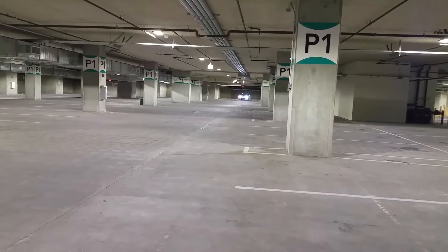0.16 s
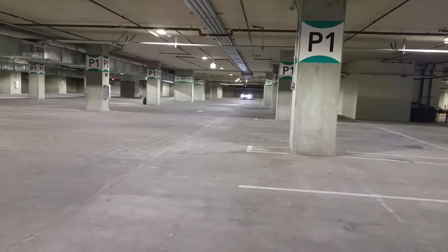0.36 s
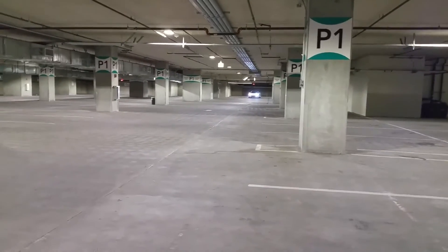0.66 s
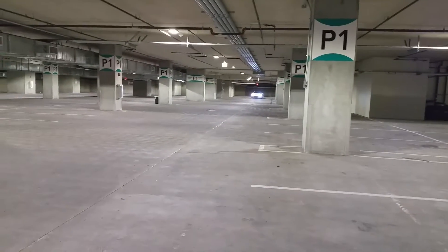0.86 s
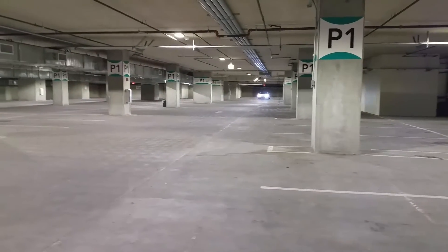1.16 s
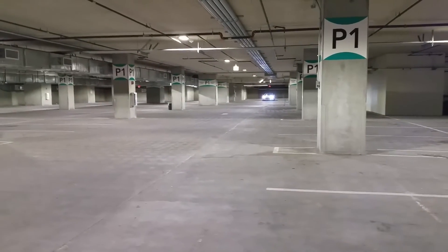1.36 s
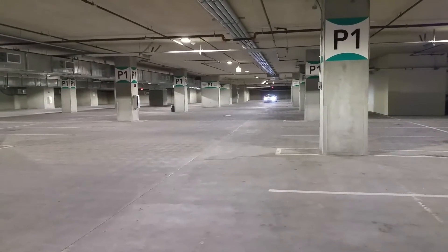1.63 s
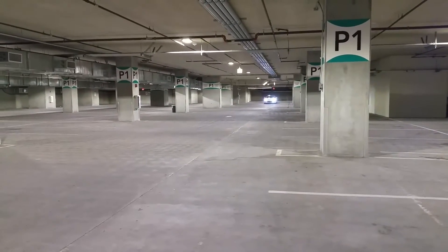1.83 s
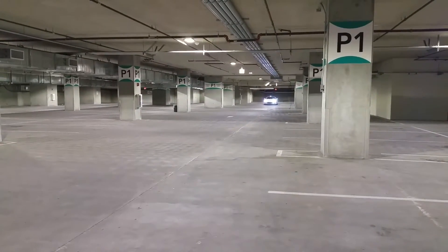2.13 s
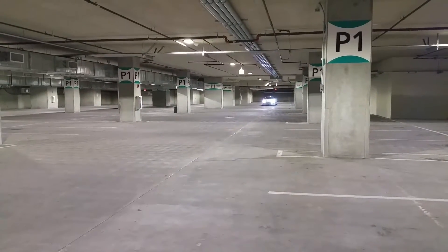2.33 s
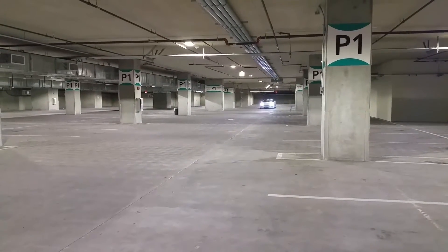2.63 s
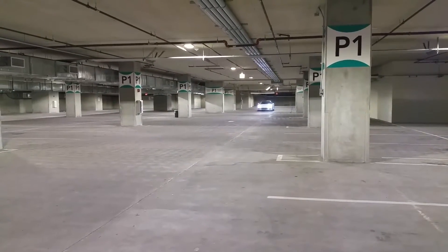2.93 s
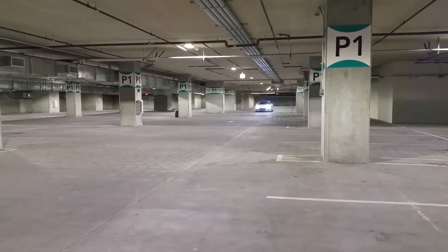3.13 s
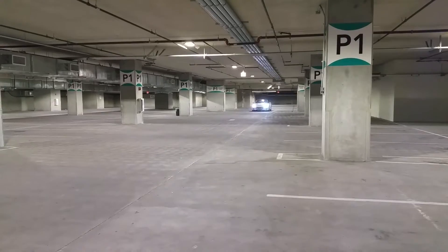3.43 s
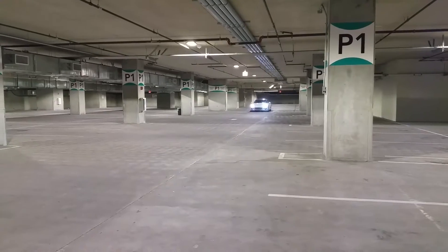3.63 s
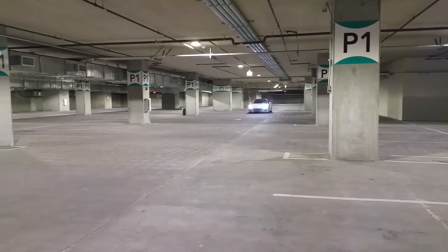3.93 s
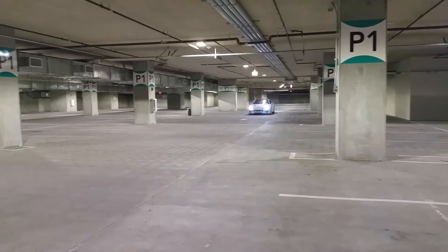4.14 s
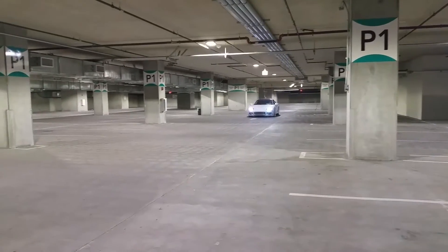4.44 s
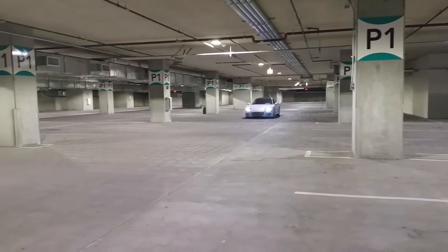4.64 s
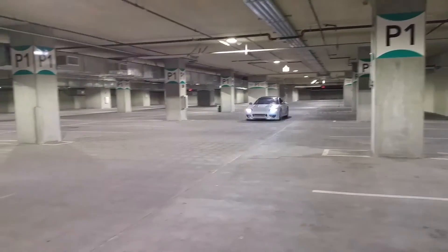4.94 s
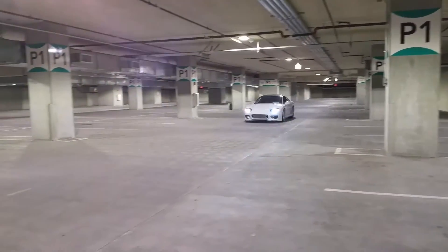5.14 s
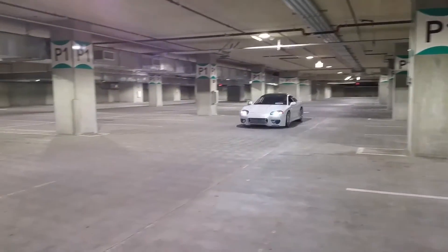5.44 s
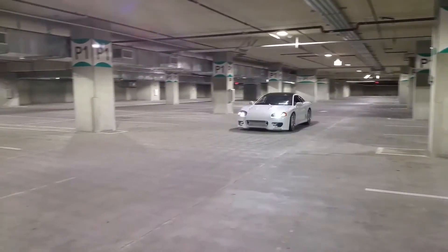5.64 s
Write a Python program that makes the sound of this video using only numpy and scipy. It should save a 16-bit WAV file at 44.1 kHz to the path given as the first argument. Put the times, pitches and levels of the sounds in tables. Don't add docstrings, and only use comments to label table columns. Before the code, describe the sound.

In an empty concrete parking garage, a distant turbocharged six-cylinder car pulls toward a small stereo recorder, its low drone climbing and roar swelling. The throttle lifts with a bright valve whistle; it pulls again, a tiny knock hits the recorder, then a longer whistle sounds and the revs fall, all smeared by long echo.

```python
import sys
import numpy as np
from scipy import signal
from scipy.fft import rfft, irfft
from scipy.io import wavfile
from scipy.ndimage import uniform_filter1d

SR = 44100
rng = np.random.default_rng(int(sys.argv[2]) if len(sys.argv) > 2 else 0)


def transcribe(signal):
    frames = np.atleast_2d(signal).T
    limited = np.clip(frames, -1, 1)
    pcm = np.round(limited * 32767).astype(np.int16)
    wavfile.write(sys.argv[1], SR, pcm)


def gain_from_db(level_db):
    decades = np.asarray(level_db, float) / 20
    return 10 ** decades


N = 254853
LEAD = SR
T = np.arange(-LEAD, N) / SR

# frequency in Hz, 60 dB decay time in s.
HALL_DECAY = [(60, 3.8), (250, 2.3), (1000, 5), (4000, 3.7), (7000, 1.32), (13000, 0.41)]
# frequency in Hz, left-right likeness from 0 to 1.
LIKENESS = [(60, 1), (130, 0.97), (300, 0.9), (680, 0.58), (1530, 0.017), (3450, 0.12), (7750, 0.03)]
# frequency in Hz, left minus right in dB.
LEAN = [(60, 2), (350, 1.5), (850, 0), (2000, -0.5), (3200, -6), (5000, -15), (6500, -8.5), (8500, -1),
        (12000, 2), (15000, 5)]

# time in s, pipe roar in dB, intake and tyre hiss in dB.
ROAR = [(0, -38, -50), (.6, -33.5, -43.5), (1.25, -28, -42), (1.8, -24.5, -36.5), (2.2, -21, -33),
        (2.53, -21, -29), (2.6, -23.5, -29), (2.75, -28.5, -28), (3.2, -21.5, -27), (3.32, -21, -29.5),
        (3.46, -25, -32), (3.9, -20.5, -30), (4.14, -20, -28), (4.25, -28.5, -31.5), (4.45, -29.5, -31),
        (4.76, -26, -28), (5.25, -25, -32.5), (5.78, -20.5, -31)]
# lower edge in Hz, upper edge in Hz.
ROAR_BANDS = [
    (60, 200),
    (250, 500),
    (500, 1500),
    (1500, 5500),
    (8000, 12000),
]
# frequency in Hz, density in dB per Hz.
ROAR_COLOUR = [(20, -62), (35, -29), (55, -12), (200, -9), (400, -18), (650, -19.5), (1000, -16.5),
               (1500, -20.5), (2200, -20), (3800, -27.5), (6000, -38), (8000, -50.5), (11000, -64),
               (15500, -73)]
BOOM_DB, BOOM_DB_PER_S = -.5, -1.
BODY_SHARE, BODY_DB, BODY_DB_PER_S = .45, -1.5, 1
AIR_DB, AIR_DB_PER_S = -25, 0.73
PUFF_DB, PUFF_DB_PER_S, PUFF_RISE_S = -20, 2.5, .04

SPOOL_S, SPOOL_HZ, SPOOL_HZ_PER_S, TOP_HZ = 3.3, 10500, 9500, 15300
RUN_DOWN_S, RUN_DOWN_TAU_S, TURBO_DB, TURBO_DB_PER_KHZ = 4.8, 1.6, -70, 2.8

# start in s, length in s, frequency in Hz, level in dB.
MURMURS = [
    (2.427, 0.36, 2240, -33),
    (2.503, 0.12, 4400, -33),
    (4.127, 0.15, 2180, -25),
    (4.152, 0.17, 1215, -26),
    (4.158, 0.087, 4460, -38),
]
# multiple of the pitch, width in Hz, level in dB.
VALVE_TONES = [
    (1, 130, 0),
    (1.598, 1500, -57.5),
    (2, 353, -30),
]
# start in s, jet level in dB, opening snap in Hz, closing rate in dB per s,
# closing rise in Hz.
LIFTS = [
    (2.568, -14, 482, 130, 123),
    (4.156, -14, 180, 24, 480.5),
]
OPEN_S, BURST_DB, BURST_S, LEAK_DB_PER_S = 0.014, 1.5, 0.028, 23
SETTLE_HZ, SAG_HZ, SAG_S, HOLD_S, SNAP_S, CLOSE_S = 6178, 661, .25, 0.6, 0.0161, .25

# time in s, firing rate of one bank in Hz.
FIRING = [(0, 52), (.2, 58), (.8, 68), (1.0, 74), (1.45, 96), (1.62, 113), (2.2, 130), (2.42, 138),
          (2.56, 134), (2.85, 64), (3.1, 60.5), (3.45, 64), (3.95, 69), (4.25, 75.5), (4.45, 77),
          (4.95, 75), (5.3, 65), (5.78, 54)]
# time in s, load in dB, multiple that the exhaust pulse favours.
LOAD = [(0, -20.5, 1.), (.45, -19, 1.1), (.95, -13, .9), (1.3, -15.5, 1.1), (1.65, -12.5, .9),
        (2.25, -16, .9), (2.5, -36.5, 2.5), (2.85, -20, 3.2), (3.1, -25, 2.4), (3.45, -15, 2.4),
        (3.9, -17, 2.6), (4.12, -14.5, 2.3), (4.27, -27, 2.2), (4.5, -20.5, 2.1), (4.9, -23, 1.9),
        (5.1, -20.5, 1.2), (5.5, -26, 1.1), (5.78, -24.5, 1.1)]
# frequency in Hz, width in Hz, level in dB under the load.
PIPE_MODES = [
    (68, 16, -19),
    (124, 20, -13),
    (192, 22, -13),
]
# frequency in Hz, gain in dB.
PIPE_GAIN = [(50, 1.5), (70, 3), (92, -3.5), (128, 2.5), (160, -4), (195, 1.5), (250, -2.5), (500, 1)]
BELOW_DB_PER_OCTAVE, ABOVE_DB_PER_OCTAVE = 11.5, 15.5
HALF_TOP_HZ, HALF_DB, HALF_DB_PER_HZ = 112, -24, .6
ROUGH_PULLING, ROUGH_COASTING, COAST_S = .9, .4, 4.2
NEARING_DB_PER_S, MIDWAY_S = 2.2, 3.

# time in s, peak in dB.
TICKS = [
    (3.4075, -20),
]
# frequency in Hz, threshold in dB relative to the
HISS_GAPS = [(7500, -45), (10000, -40), (12000, -31), (14000, -30), (16000, -28)]
# frequency in Hz, threshold in dB relative to the
WHISTLE_GAPS = [(7500, -22), (9600, -25), (10300, -43), (13500, -46), (14000, -36)]


def evened(x):
    return x / np.sqrt(np.mean(x ** 2) + 1e-20)


def read(points, hz):
    f, value = np.transpose(points)
    return np.interp(np.log(hz + 1), np.log(f + 1), value)


def columns(rows, t):
    s, *rest = np.transpose(rows)
    return [np.interp(t, s, c) for c in rest]


def wander(rate_hz):
    pole = np.exp(-2 * np.pi * rate_hz / SR)
    return evened(signal.lfilter([1], np.poly([pole, pole]), rng.standard_normal(len(T))))


def fuzzy(hz, width_hz):
    pole = np.exp(-np.pi * width_hz / SR)
    noise = rng.standard_normal((len(T), 2)) @ [1, 1j]
    breath = signal.lfilter([1], np.poly([pole, pole]), noise)
    return evened((breath * np.exp(2j * np.pi * np.cumsum(hz) / SR)).real)


def ports(a, b, hz):
    same = np.clip(read(LIKENESS, hz), 0, 1)
    lean = gain_from_db(read(LEAN, hz) / 2)
    return np.array([a * lean, (same * a + np.sqrt(1 - same ** 2) * b) / lean])


def hall(x, direct_db, turns, nearing_db=0, count=3):
    size = 3 * 2 ** 17
    hz, t, z = signal.stft(rng.standard_normal((count, 2, 2 * SR)), SR, nperseg=512)
    decay_s = read(HALL_DECAY, hz)[:, None]
    z = z * gain_from_db(-60 * t / decay_s) * np.sqrt(2. / decay_s)
    tails = signal.istft(z, SR, nperseg=512)[1]
    tails = tails / np.linalg.norm(tails[0, 0])
    tails[:, :, :300] = 0
    wet = 0
    for k, tail in enumerate(tails):
        share = np.cos(np.pi * (turns * T + k / count)) * np.sqrt(2 / count)
        wet = wet + rfft(x * share, size) * rfft(tail, size)
    wet += rfft(x * gain_from_db(direct_db + nearing_db * (T - MIDWAY_S)), size)
    return irfft(ports(*wet, np.fft.rfftfreq(size, 1 / SR)))[:, LEAD:LEAD + N]


def vents():
    high = gain_from_db(-56.0) * fuzzy(5850. + 0 * T, width_hz=850.0)
    return high + gain_from_db(-51.5) * fuzzy(1500.0 + 0 * T, width_hz=220.0)


def roar_levels(t):
    pipe_db, hiss_db = columns(ROAR, t)
    puff = 0
    for lift in LIFTS:
        puff_db = jet(t, *lift)[1] + PUFF_DB + PUFF_DB_PER_S * (lift[0] - LIFTS[-1][0])
        puff = puff + gain_from_db(2 * puff_db) * np.clip((t - lift[0]) / PUFF_RISE_S, 0, 1) ** 2
    boom_db = pipe_db + BOOM_DB + BOOM_DB_PER_S * t
    body_db = BODY_SHARE * pipe_db + (1 - BODY_SHARE) * hiss_db + BODY_DB + BODY_DB_PER_S * t
    air_db = 10 * np.log10(gain_from_db(2 * (hiss_db + AIR_DB + AIR_DB_PER_S * t)) + puff)
    return np.array([boom_db, pipe_db, body_db, hiss_db, air_db]).T


def roar():
    frames, hz = N // 256 + 5, np.fft.rfftfreq(1024, 1 / SR)
    a, b, c, d, patches = rng.standard_normal((frames, 513, 5)).T
    patches = uniform_filter1d(patches, size=14, axis=0)
    patches = evened(uniform_filter1d(patches, size=24, axis=1))
    colour_db = read(ROAR_COLOUR, hz)
    power = gain_from_db(2 * colour_db)
    own_db = [10 * np.log10(np.sum(power[(hz > lo) & (hz < hi)])) for lo, hi in ROAR_BANDS]
    lift_db = roar_levels(np.arange(frames) * 256 / SR) - own_db
    centres = np.sqrt(np.prod(ROAR_BANDS, axis=1))
    field_db = np.array([read(np.c_[centres, row], hz) for row in lift_db]).T
    z = ports((a + 1j * b).T, (c + 1j * d).T, hz).transpose(0, 2, 1)
    z = z * gain_from_db(colour_db[:, None] + field_db + 0.34 * patches)
    return gain_from_db(5.) * signal.istft(z, nperseg=1024, noverlap=768)[1][:, :N]


def turbo():
    late = np.maximum(T - RUN_DOWN_S, 0)
    drop_hz = TOP_HZ * (1 - np.exp(-late / RUN_DOWN_TAU_S))
    hz = np.clip(SPOOL_HZ + SPOOL_HZ_PER_S * (T - SPOOL_S), SPOOL_HZ, TOP_HZ) - drop_hz
    level = gain_from_db(TURBO_DB + TURBO_DB_PER_KHZ * drop_hz / 1000)
    return level * np.clip((T - SPOOL_S) / .3, 0, 1) * fuzzy(hz, width_hz=650.)


def murmurs():
    out = np.zeros(len(T))
    for s, length, hz, db in MURMURS:
        swell = np.sin(np.pi * np.clip((T - s) / length, 0, 1)) ** .5
        out += gain_from_db(db) * swell * fuzzy(hz + 0 * T, width_hz=220.0)
    return out


def jet(t, s, jet_db, snap_hz, closing_db, rise_hz):
    u, late = np.maximum(t - s, 1e-6), np.maximum(t - s - HOLD_S, 0)
    hz = SETTLE_HZ + SAG_HZ * np.exp(-u / SAG_S) + snap_hz * np.exp(-u / SNAP_S)
    hz = hz + rise_hz * (1 - np.exp(-late / CLOSE_S))
    level_db = jet_db + BURST_DB * np.exp(-u / BURST_S) - LEAK_DB_PER_S * (u - late) - closing_db * late
    return hz, level_db + 20 * np.log10(np.minimum(u / OPEN_S, 1) ** 2)


def valve():
    out = np.zeros(len(T))
    for lift in LIFTS:
        hz, jet_db = jet(T, *lift)
        flutter = np.clip(8 * (T - lift[0]), 0, 1) * wander(rate_hz=35.)
        hz = hz * (1 + .022 * flutter)
        fade_db = np.minimum(jet_db + 15.5, 0)
        tones = sum(gain_from_db(db + 1.5 * (k - 1) * fade_db) * fuzzy(k * hz, width) for k, width, db in VALVE_TONES)
        skirt = gain_from_db(-4.0) * fuzzy(hz, width_hz=470.0)
        out += gain_from_db(jet_db) * (tones + skirt)
    return out


def exhaust():
    hz = columns(FIRING, T)[0]
    load_db, favoured = columns(LOAD, T)
    rough = np.where(T < COAST_S, ROUGH_PULLING, ROUGH_COASTING)
    turns = np.cumsum(hz * (1 + .025 * rough * wander(rate_hz=14.))) / SR
    drone, power = 0, 0
    for k in range(1, 7):
        slope = np.where(k < favoured, BELOW_DB_PER_OCTAVE, ABOVE_DB_PER_OCTAVE)
        db = load_db - slope * abs(np.log2(k / favoured)) + read(PIPE_GAIN, k * hz)
        power = power + gain_from_db(2 * db)
        uneven_db = 4.2 * rough * wander(rate_hz=9.)
        drone = drone + np.sqrt(2) * gain_from_db(db + uneven_db) * np.sin(2 * np.pi * k * turns)
    half_db = HALF_DB - HALF_DB_PER_HZ * np.maximum(HALF_TOP_HZ - hz, 0)
    half_db = half_db + 5.1 * rough * wander(rate_hz=12.5)
    drone += np.sqrt(2) * gain_from_db(half_db) * np.sin(3 * np.pi * turns)
    pipe = sum(gain_from_db(db) * fuzzy(mode_hz + 0 * T, width) for mode_hz, width, db in PIPE_MODES)
    rumble = gain_from_db(-16.0) * fuzzy(1.6 * hz, width_hz=110.0)
    return drone + np.sqrt(power) * (pipe + rumble)


def scene():
    jets = vents() + turbo() + murmurs() + valve()
    drone = hall(exhaust(), direct_db=1.5, turns=.9, nearing_db=NEARING_DB_PER_S) * gain_from_db(-4.)
    return roar() + hall(jets, direct_db=-4.0, turns=2.3) + drone


def ticks():
    out = np.zeros(N)
    for s, peak_db in TICKS:
        out[round(s * SR)] = gain_from_db(peak_db)
    return signal.lfilter([1, -1], [1, -.85], out) * np.ones((2, 1))


def gap_treble(x):
    hz, t, z = signal.stft(x, SR, nperseg=2048, window="cosine", boundary="even")
    bands = (abs(z[:, :1024]) ** 2).reshape(2, 64, 16, -1).mean(2)
    centre, level_db = hz[8:1024:16], 10 * np.log10(bands + 1e-20)
    hiss_db = level_db[:, 8:16].mean(1, keepdims=True)
    whistle_db = level_db[:, 16:21].max(1, keepdims=True)
    under_hiss_db = hiss_db + read(HISS_GAPS, centre)[:, None]
    under_whistle_db = whistle_db + read(WHISTLE_GAPS, centre)[:, None]
    least_db = np.maximum(under_hiss_db, under_whistle_db)
    keep = 1 / (1 + gain_from_db(np.clip(12. * (least_db - level_db), -200, 200)))
    keep = np.where(centre[:, None] > 7500, keep, 1)
    z[:, :1024] *= np.repeat(keep, 16, axis=1)
    return signal.istft(z, SR, nperseg=2048, window="cosine")[1][:, :N]


def roll_off(x):
    return signal.sosfilt(signal.butter(12, 15770, fs=SR, output="sos"), x)


def record(dry):
    dry = signal.sosfilt(signal.butter(2, 48., "high", fs=SR, output="sos"), dry)
    dry = dry + gain_from_db(-62) * rng.standard_normal(dry.shape)
    overloaded = 1.316 * np.tanh(dry / 1.672)
    return roll_off(gap_treble(overloaded) + ticks())


dry = scene()
out = record(dry)
transcribe(out)
```